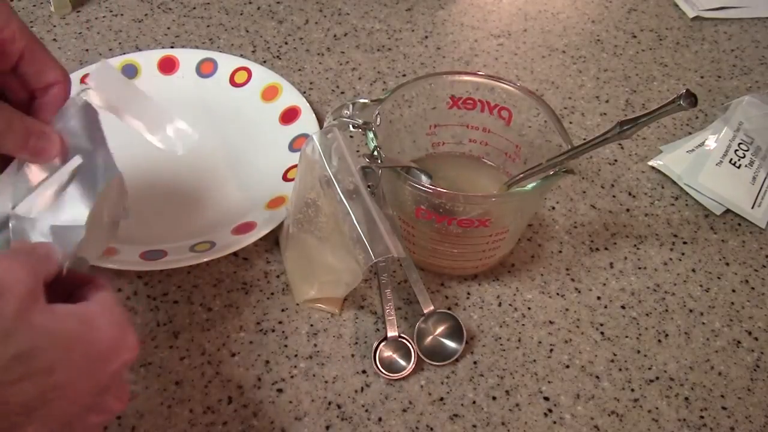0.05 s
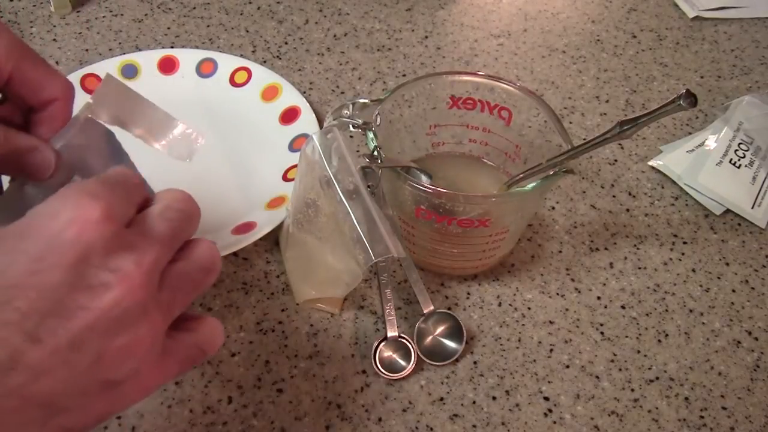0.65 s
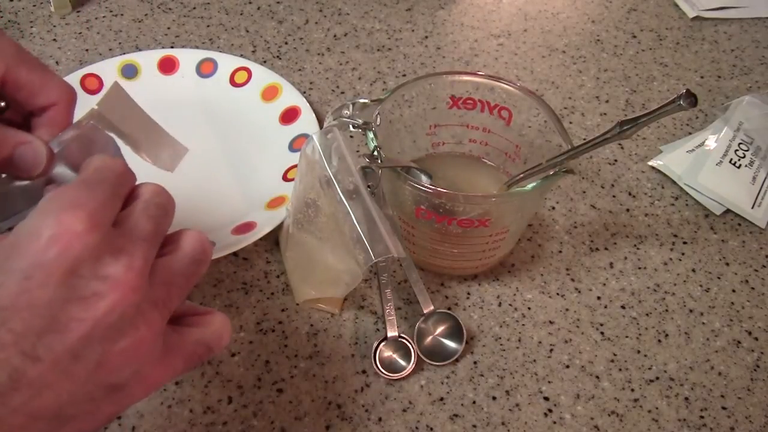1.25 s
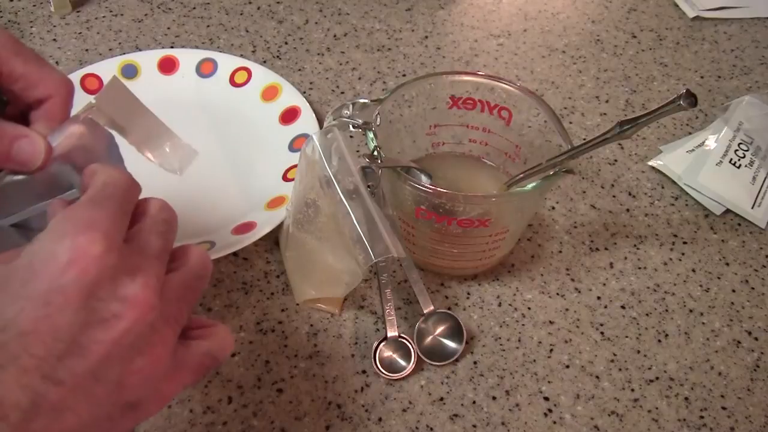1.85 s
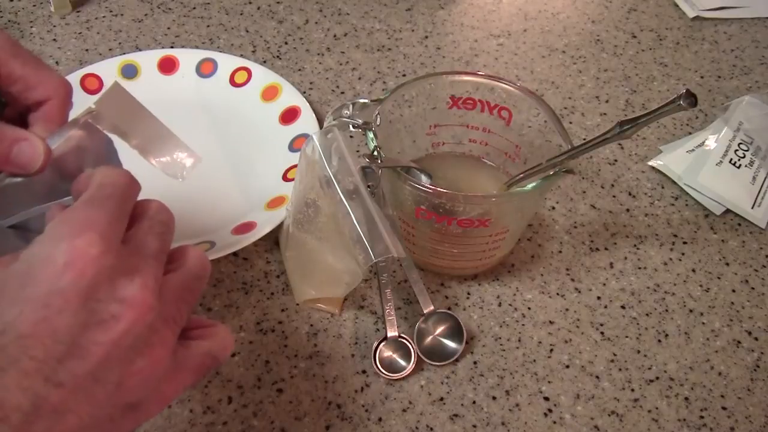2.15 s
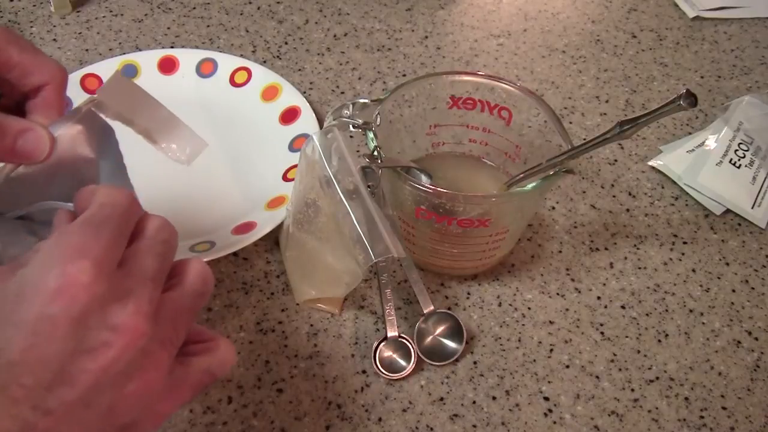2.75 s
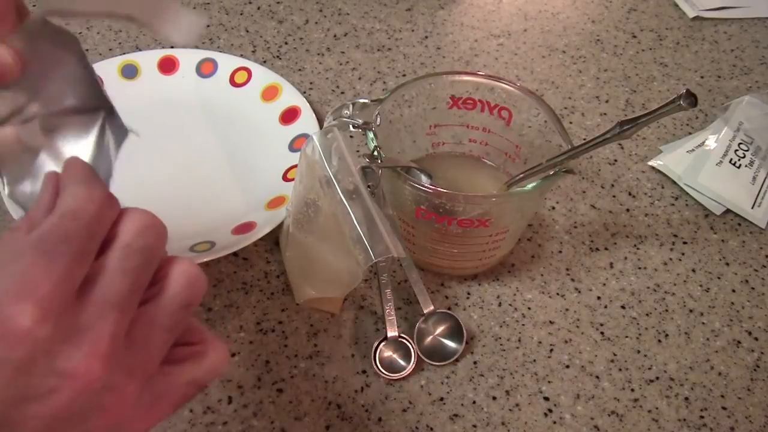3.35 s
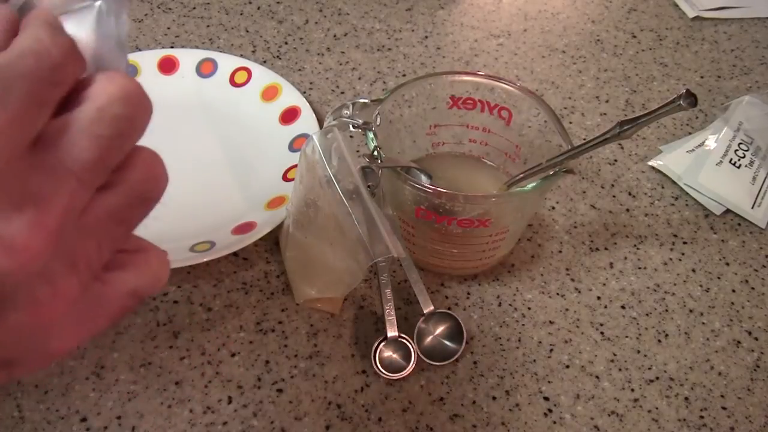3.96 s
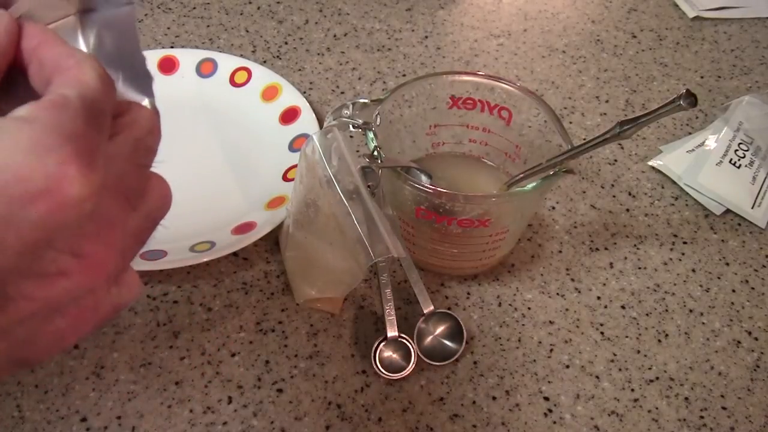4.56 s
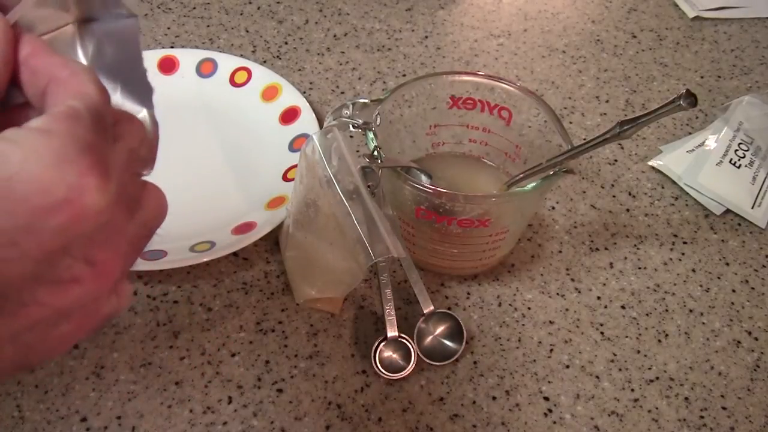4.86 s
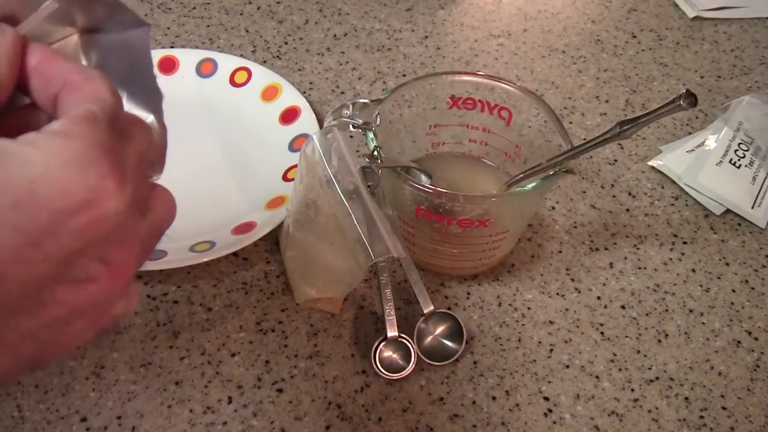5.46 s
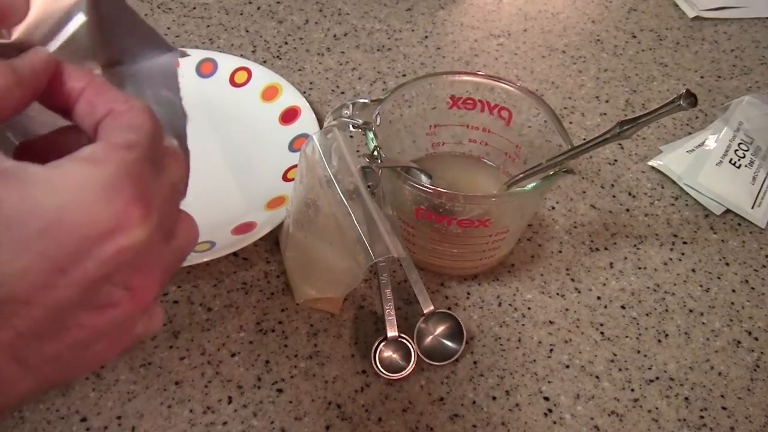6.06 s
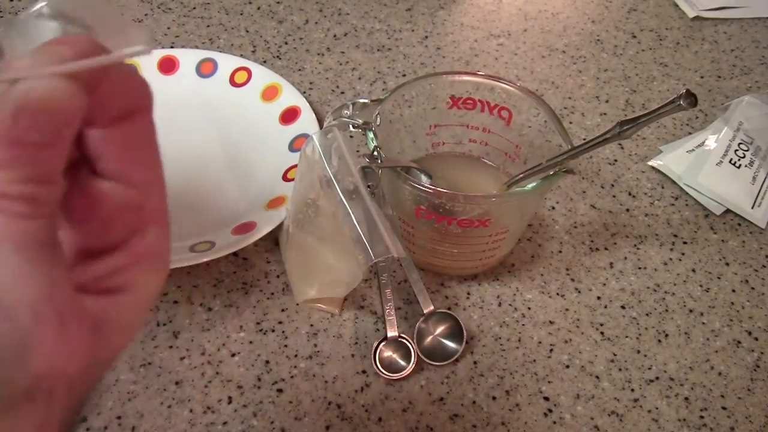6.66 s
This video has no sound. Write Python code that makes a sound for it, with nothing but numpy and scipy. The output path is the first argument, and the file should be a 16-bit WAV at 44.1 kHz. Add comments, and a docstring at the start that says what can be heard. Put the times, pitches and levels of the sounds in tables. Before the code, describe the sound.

In a quiet kitchen with a low, steady motor hum, a foil pouch crinkles in short bursts, close and slightly to the left. After some early crackles and a lull with small rustles, it gives its sharpest snap and crackles open. Fingers then rub and scrape around inside, ending in a last cluster of snaps, each with a brief room echo.

```python
"""Two hands open a small foil pouch over a kitchen counter; an appliance motor hums throughout.
First, rubbing fingers make a fine crackle, creases give way in rasps, panels buckle with snaps.
From 1 to 3 s the handling is sparse. The loudest snap comes at 3.4 s; then the pouch is spread open.
Fingers fish inside, scraping a taut wall, and end in a burst of snaps near 6.2 s.
The kitchen answers each sound briefly."""
import sys
import numpy as np
from scipy import signal
from scipy.fft import rfft, irfft, next_fast_len
from scipy.io import wavfile

SR = 44100
rng = np.random.default_rng(int(sys.argv[2]) if len(sys.argv) > 2 else 0)


def transcribe(u):
    """Save the signal u as a 16-bit wav file named by the first command-line argument.

    u: samples, shape (n,) or (channels, n), limited to [-1, 1]; the rate is SR.
    q: integer samples, one column per channel.
    """
    v = np.clip(np.atleast_2d(u).T, -1, 1)
    q = np.round(v * 32767).astype(np.int16)
    wavfile.write(sys.argv[1], SR, q)


N = 295470
TIME_S = np.arange(N) / SR
OPENS_S, FLEX_S, STROKE_LEAD_S = 3.58, .06, .1
HOLDING_DB = (-74, 4.5, -6)   # faint stir of the held pouch: crack, body re crack, fizz re crack
FACET_EDGES_HZ = np.linspace(np.sqrt(200), np.sqrt(15000), 16) ** 2

# Still air and microphone hiss. Each row: frequency in Hz, density in dB per Hz.
AIR_DENSITY_DB = [(20, -90.5), (45, -88.5), (100, -88.5), (190, -82), (300, -82), (450, -88.5), (750, -91),
                  (1400, -99), (2800, -103), (5000, -110), (8000, -116), (13000, -120), (16000, -130)]
# Stereo width of the air. Each row: frequency in Hz, left-right correlation.
AIR_CORRELATION = [(30, 0.29), (80, 0.55), (180, 0.93), (380, 0.33), (950, 0.17), (2400, 0.32), (6000, .25),
                   (15000, 0.092)]
# Motor and mains. Each row: frequency in Hz, rms level in dB, waver from 0 to 1.
HUM_LINES = [(118.7, -75.5, .15), (166.6, -73.5, 0.7), (207.4, -64, 0.92), (237.9, -63.5, 0.3),
             (268.3, -57.5, 0.24), (359.2, -67, 0.1)]
# Stereo width of the reverb. Each row: frequency in Hz, left-right correlation.
ROOM_CORRELATION = [(200, 0.876), (1600, 0.98), (5000, 0.9), (14000, 0.44)]
# Room tail decay. Each row: frequency in Hz, T60 in seconds.
TAIL_T60_S = [(200, 2.5), (530, 0.45), (1400, 0.46), (3700, 0.42), (9700, 0.5), (15000, 0.4)]
# Room tail strength. Each row: frequency in Hz, gain in dB.
TAIL_GAIN_DB = [(200, -14.5), (600, -9.5), (1400, -11.5), (3000, -13), (7000, -13.5), (14000, -26.5)]
# Microphone port balance. Each row: frequency in Hz, left minus right in dB.
PORT_BALANCE_DB = [(600, 0.3), (1300, 1.5), (3000, 1.6), (5000, -0.23), (9000, 1), (11000, 0.5),
                   (13000, -11), (16000, 2)]
# Microphone port phase. Each row: frequency in Hz, lead of the left port in radians.
PORT_LEAD_RAD = [(1000, 0.2), (4000, 0.21), (8000, 0.61), (11500, .2), (13100, 1.6)]
# Foil registers: hollow, body, crack, fizz. Each row: low edge in Hz, high edge in Hz.
REGISTERS_HZ = [(230, 850), (850, 1800), (1800, 5000), (5000, 13300)]
# Pouch resonances. Each row: frequency in Hz, width in Hz, gain when flat in dB, gain when open in dB.
POUCH_MODES = [(300, 160, -5.5, -1), (474, 130, 3.5, -2), (713, 210, -4.5, -3), (1093, 140, -6.5, -0.5),
               (1377, 210, 2.5, -1.5), (1977, 260, -0.5, -2), (2515, 240, 0, 5), (2930, 680, -1, -9),
               (4330, 710, -10, -11.5), (7598, 1200, -5, -3.5), (9700, 2800, -15, -9)]
# Air sounding in the pouch. Each row: time in seconds, hollow in dB re body.
CAVITY_DB = [(0, -16), (.45, -8), (.62, 0.5), (1.4, -6.5), (3.55, -8.5), (3.85, 3), (4.0, -2), (4.15, -11),
             (5.6, 1), (6.2, 0)]
# Crackle colour. Each row: frequency in Hz, gain in dB.
CRACKLE_COLOUR_DB = [(250, 5.5), (1000, 2.5), (1700, 0), (2300, 0.5), (2800, 0), (3600, 0), (4600, -0.5),
                     (5800, -1), (8000, -5.5), (10500, -3.5), (12500, -8), (15000, -5)]
# Fingertip squeaks. Each row: centre in seconds, half length in seconds, pitch in Hz, level in dB.
FINGER_SQUEAKS = [(0.359, 0.0038, 4130, -55.5), (5.46, 0.0059, 3800, -57), (6.193, 0.0055, 9900, -48)]
# Resonance of a taut wall. Each row: time in seconds, pitch in Hz, relative level in dB.
WALL_RESONANCE = [(2.4, 3010, -75), (2.58, 3030, -68), (3.1, 2915, -61.5), (3.5, 2417, -57.5),
                  (3.7, 2442, -59), (4.1, 2330, -48.5), (4.3, 2694, -85), (4.68, 2490, -66),
                  (4.95, 2600, -69), (5.22, 2670, -62.5), (5.4, 2593, -88), (5.6, 1545, -69),
                  (5.69, 1520, -57), (5.8, 1505, -72), (6.0, 2600, -90), (6.11, 2600, -49.5),
                  (6.22, 2580, -53), (6.36, 2392, -85.5)]
# Creases giving way. Each row: centre in seconds, half length in seconds, relative crack level in dB,
# body and fizz in dB re crack.
CREASE_RASPS = [(0.547, 0.0016, -54, 5, -5), (0.603, 0.0032, -35, -5, 3), (0.6077, 0.0015, -36.5, -6, 2),
                (0.6153, 0.0026, -26, 0, -3.5), (1.234, 0.0019, -49.5, 7, -6), (1.418, 0.0026, -48, 3, -8),
                (3.652, .0025, -36, -3, -10.5), (3.663, 0.0049, -35.5, -3.5, -12),
                (6.212, 0.00326, -36.5, 0, -4)]
# Finger slides. Each row: start in seconds, length in seconds, relative crack level in dB,
# body and fizz in dB re crack.
FINGER_STROKES = [(0, 0.01, -48, 3, -11), (0.033, 0.072, -59.5, 3.5, -12), (0.165, 0.01, -50.5, -4, -4),
                  (0.224, 0.076, -60, 0, -3), (0.349, 0.15, -68, 5, -16), (0.593, 0.035, -46.5, -2.5, -2),
                  (0.67, 0.064, -56, 0, -11), (0.801, 0.13, -62, 2, -15), (1.438, 0.15, -58, 1.5, -10.5),
                  (2.573, 0.035, -68, -1.5, -14.5), (2.79, 0.016, -53.5, -2.5, -12.5),
                  (2.885, 0.13, -64, -3, -13), (3.113, 0.018, -54.5, -8, -8), (3.21, 0.187, -58, -4, -11.5),
                  (3.384, 0.055, -43.5, -2.5, -6.5), (3.469, 0.043, -51, 3.5, -26),
                  (3.676, 0.18, -51.5, 0.5, -7), (3.816, 0.0254, -48, 0, -10),
                  (3.895, 0.044, -62.5, -6, 3.5), (3.954, 0.036, -45.5, -1.5, -12),
                  (3.983, 0.021, -43, 2.5, -10.5), (4.067, 0.052, -48, -3, -15.5),
                  (4.24, 0.085, -66.5, 1, -8), (4.391, 0.21, -63, -5, -16), (4.634, 0.11, -57, -2.5, -14.5),
                  (4.886, 0.019, -58.5, -2.5, -13), (5.037, 0.12, -67, 2, -18),
                  (5.174, 0.097, -58.5, -9, -13.5), (5.443, 0.0097, -61.5, -5, -6),
                  (5.519, 0.079, -60.5, 1, -16), (5.655, 0.1375, -64.5, -4, -11),
                  (6.076, 0.16, -52.5, -5.5, -10.5), (6.187, 0.012, -40, -11.5, -7),
                  (6.234, 0.011, -53, -2, -18.5)]
# Buckling panels. Each row: start in seconds, lower and upper pitch in Hz,
# attack levels of hollow, body, crack and fizz in dB.
PANEL_SNAPS = [(0.1346, 1100, 2050, -58, -51.5, -59, -76), (0.1713, 1300, 2900, -54, -45, -55, -60),
               (0.352, 527, 3900, -49.5, -61, -49.5, -68), (0.4103, 1510, 2270, -57.5, -52, -55, -79.5),
               (0.7309, 780, 1420, -46, -41.5, -56, -68.5), (0.7363, 1000, 3300, -49, -50, -58, -64),
               (0.7776, 515, 1460, -37.5, -27.5, -32, -53), (0.7948, 870, 1470, -49.5, -33.5, -42.5, -55),
               (0.8049, 1210, 2520, -43, -43, -53, -67), (0.8105, 1300, 2300, -49, -54, -53, -67),
               (0.8245, 1300, 2120, -53, -48, -53, -69), (1.6437, 1390, 2880, -63, -54, -59.5, -73.5),
               (2.4486, 1400, 2930, -57, -52, -51.5, -66), (3.1187, 1330, 3000, -59, -48, -53, -53.5),
               (3.1728, 1290, 3100, -44, -37, -35.5, -55), (3.3824, 1137, 2385, -38.5, -16, -17, -25.5),
               (3.4083, 1250, 2130, -56, -30, -30.5, -34), (3.4356, 1300, 3170, -61, -43, -35, -51),
               (3.6826, 1400, 2410, -66, -54, -53, -53), (3.7274, 2226, 8100, -60, -60, -44, -51),
               (3.7361, 2350, 4640, -64, -52, -39, -46), (3.7405, 1400, 2530, -54, -53, -33.5, -41),
               (3.7735, 2400, 10000, -48, -53, -45, -47), (3.788, 1020, 2620, -38.5, -25.5, -24.5, -33.5),
               (3.8175, 1050, 2400, -52, -43, -46, -56), (3.861, 785, 2400, -42, -47.5, -45.5, -55),
               (3.9605, 750, 2500, -48, -57, -45, -60), (4.001, 820, 2350, -53, -42, -41.5, -53),
               (4.0378, 600, 1258, -58, -45, -61, -74), (4.0881, 1152, 2000, -39, -31, -30, -45),
               (4.1564, 2000, 3000, -67, -60, -46.5, -62), (4.2037, 830, 2300, -49, -40, -36.5, -56),
               (4.354, 1266, 1520, -51, -37, -43.5, -66), (4.3869, 2330, 8900, -69, -71, -53.5, -61),
               (4.9063, 1037, 1375, -60, -49.5, -56, -81.5), (5.0069, 2630, 4060, -54, -59, -33.5, -38),
               (5.792, 433, 690, -34, -34.5, -35.5, -59.5), (5.8216, 1110, 2840, -50, -48, -43.5, -67),
               (5.8675, 4000, 11600, -76, -78, -55, -54), (6.0396, 1970, 4000, -44.5, -41, -32.5, -48.5),
               (6.2078, 4300, 10500, -49, -44, -33.5, -43), (6.2098, 402, 2100, -37, -36.5, -32.5, -40),
               (6.2265, 2580, 3220, -63, -59, -40, -51)]


def from_db(db):
    """Decibels to gain."""
    return 10 ** (np.asarray(db) / 20)


def unit_rms(x):
    """Scale to rms 1."""
    return x / np.sqrt(np.mean(x ** 2) + 1e-20)


def in_time(rows):
    """One time curve per value column."""
    times_s, *columns = np.transpose(rows)
    return [np.interp(TIME_S, times_s, column) for column in columns]


def at_hz(points, hz):
    """Interpolate over log frequency."""
    points_hz, values = np.transpose(points)
    return np.interp(np.log(np.maximum(hz, 1)), np.log(points_hz), values)


def coloured(x, colour_db):
    """Apply a gain curve over frequency."""
    size = next_fast_len(N + 4096)
    gain = from_db(at_hz(colour_db, np.fft.rfftfreq(size, 1 / SR)))
    return irfft(rfft(x, size) * gain, size)[:N]


def band(x, edges_hz, order=3):
    """Causal band-pass."""
    return signal.sosfilt(signal.butter(order, edges_hz, "band", fs=SR, output="sos"), x + 1e-18)


def drift(rate_hz):
    """Smooth random curve, rms 1."""
    step, settle = 40, 2000
    pole = np.exp(-2 * np.pi * rate_hz * step / SR)
    white = rng.standard_normal(N // step + settle + 2)
    slow = signal.lfilter([1], [1, -2 * pole, pole * pole], white)[settle:]
    return np.interp(np.arange(N) / step, np.arange(len(slow)), unit_rms(slow))


def rough_tone(phase_rad, width_hz):
    """Narrow noise around a carrier."""
    return drift(width_hz) * np.cos(phase_rad) + drift(width_hz) * np.sin(phase_rad)


def swell(centre_s, half_s):
    """Bell-shaped gain."""
    return np.exp(-np.minimum(((TIME_S - centre_s) / half_s) ** 2 / 2, 50))


def add(out, start_s, sound):
    """Mix a short sound in."""
    start = int(np.clip(start_s * SR, 0, N - 1))
    out[start:start + len(sound)] += sound[:N - start]


def stereo(mid, side, correlation):
    """Two independent noises to a correlated left and right."""
    alike = np.clip(correlation, 0, 1)
    return (np.sqrt(1 + alike) * mid + np.sqrt(1 - alike) * np.array([side, -side])) / np.sqrt(2)


def air():
    """Soft, even room noise, alike at both ports only in the bass."""
    size = next_fast_len(N)
    hz = np.fft.rfftfreq(size, 1 / SR)
    mid, side = rfft(rng.standard_normal((2, size)))
    ports = stereo(mid, side, at_hz(AIR_CORRELATION, hz))
    return irfft(ports * from_db(at_hz(AIR_DENSITY_DB, hz)) * np.sqrt(SR / 2), size)[:, :N]


def hum(waver_hz=3, spread_rad=0.09):
    """Wavering motor and mains lines; standing waves give each port its own phase."""
    mid, side = np.zeros((2, N))
    for hz, db, waver in HUM_LINES:
        phase_rad = 2 * np.pi * (hz * TIME_S + rng.random())
        cos, sin = from_db(db) * np.cos(phase_rad), from_db(db) * np.sin(phase_rad)
        in_phase = np.sqrt(2 - 2 * waver ** 2) + waver * drift(waver_hz)
        quadrature = waver * drift(waver_hz)
        mid += in_phase * cos - quadrature * sin
        side += spread_rad * (in_phase * sin + quadrature * cos)
    return np.array([mid + side, mid - side])


def kitchen(x, near_db=-19, near_t60_s=0.038, gap_s=.004):
    """Close reflections from dishes and counter, then the room tail, in half-octave bands."""
    t = TIME_S[:int(.6 * SR)]
    late_s = np.maximum(t - gap_s, 0)

    def decay(t60_s):
        """Envelope of unit energy."""
        return (t > gap_s) * from_db(-60 * late_s / t60_s) * np.sqrt(np.log(1e6) / (t60_s * SR))

    near = from_db(near_db) * decay(near_t60_s)
    edges_hz = np.geomspace(16, 17000, 21)
    white = rng.standard_normal((2, 2, len(t)))
    response = 0
    for k, (low_hz, high_hz) in enumerate(zip(edges_hz, edges_hz[1:])):
        hz = np.sqrt(low_hz * high_hz)
        mid, side = band(white[k % 2], [low_hz, high_hz], order=2)
        tail = from_db(at_hz(TAIL_GAIN_DB, hz)) * decay(at_hz(TAIL_T60_S, hz))
        response += stereo(mid, side, at_hz(ROOM_CORRELATION, hz)) * (near + tail)
    return signal.fftconvolve(x[None], response, axes=1)[:, :N]


def squeaks(relative_width=0.082):
    """Skin sticks and slips evenly enough for a brief, rough tone."""
    return sum(from_db(db) * swell(s, half_s) * rough_tone(2 * np.pi * hz * TIME_S, relative_width * hz)
               for s, half_s, hz, db in FINGER_SQUEAKS)


def scrape(half_width_hz=250, catch_db=2, catch_hz=30, gain_db=-4):
    """Friction catches and slides, driving a wall resonance that sinks as the pouch slackens."""
    hz, db = in_time(WALL_RESONANCE)
    grip = from_db(db + gain_db + catch_db * drift(catch_hz))
    return grip * rough_tone(2 * np.pi * np.cumsum(hz) / SR, half_width_hz)


def ring(hz, width_hz):
    """25 ms impulse response of a unit-height resonance."""
    t = TIME_S[:int(.025 * SR)]
    return 2 * np.pi * width_hz / SR * np.exp(-np.pi * width_hz * t) * np.cos(2 * np.pi * hz * t)


def pouch_ring(at_s, detune, uneven_db, scatter, scatter_t60_s=0.012, coating_hz=4500):
    """One click: each fold shifts the modes, the coating dulls them, creases and seams scatter them."""
    modes = 0
    for hz, width_hz, flat_db, open_db in POUCH_MODES:
        db = (flat_db if at_s < OPENS_S else open_db) + uneven_db * rng.standard_normal()
        modes += from_db(db) * ring(hz * np.exp(detune * rng.standard_normal()), width_hz)
    modes = signal.sosfilt(signal.butter(1, coating_hz, fs=SR, output="sos"), modes)
    echoes = rng.standard_normal(len(modes)) * from_db(-60 * TIME_S[:len(modes)] / scatter_t60_s)
    echoes /= np.sqrt(np.sum(echoes ** 2))
    return modes + scatter * signal.fftconvolve(modes, echoes)[:len(modes)]


def slips(per_s, spread_db):
    """Tiny slips of uneven size at random moments, rms 1."""
    sizes = from_db(spread_db * np.minimum(rng.exponential(1, N), 4))
    signs = np.sign(rng.random(N) - .5)
    return unit_rms(sizes * signs * (rng.random(N) < per_s / SR))


def facets(per_s, spread_db):
    """Facets between creases flick over, each pinging in its own narrow band; rms 1."""
    bands_hz = zip(FACET_EDGES_HZ, FACET_EDGES_HZ[1:])
    return unit_rms(sum(band(slips(per_s, spread_db), edges_hz, order=2) for edges_hz in bands_hz))


def crackle(clicks):
    """Clicks ring the foil, which changes shape every FLEX_S. One row per register, rms 1."""
    foil = np.zeros(N)
    flex = int(FLEX_S * SR)
    for start in range(0, N, flex):
        fold = pouch_ring(start / SR, detune=0.066, uneven_db=1.0, scatter=0.32)
        add(foil, start / SR, signal.fftconvolve(clicks[start:start + flex], fold))
    foil = coloured(foil, CRACKLE_COLOUR_DB)
    return np.array([unit_rms(band(foil, edges_hz)) for edges_hz in REGISTERS_HZ])


def register_gains(crack_db, body_db, fizz_db, hollow_db):
    """Gains of the four registers, low to high."""
    return from_db([crack_db + body_db + hollow_db, crack_db + body_db, crack_db, crack_db + fizz_db])


def rasps(hollow_db, gain_db=-3.5):
    """Slips crowd into a few milliseconds as a crease rolls over."""
    gains = np.zeros((len(REGISTERS_HZ), N))
    for s, half_s, *levels_db in CREASE_RASPS:
        gains += np.outer(register_gains(*levels_db, hollow_db[int(s * SR)]), swell(s, half_s))
    return from_db(gain_db) * np.sum(gains * crackle(slips(per_s=9800, spread_db=2.5)), axis=0)


def stroke(length_s, rise_db_per_s=499.5, sag_db_per_s=5.5, fall_db_per_s=286):
    """Gain of a stroke, from STROKE_LEAD_S before its start: takes hold, eases, dies away."""
    t = TIME_S[:int((length_s + 3 * STROKE_LEAD_S) * SR)] - STROKE_LEAD_S
    return from_db(rise_db_per_s * np.minimum(t, 0) - sag_db_per_s * np.clip(t, 0, length_s)
                   - fall_db_per_s * np.maximum(t - length_s, 0))


def rubbing(hollow_db, gain_db=-2.02, tick_db=-9):
    """Fingers slide over the foil: fine, dense crackle with lone ticks."""
    power = np.outer(register_gains(*HOLDING_DB, hollow_db.mean()) ** 2, np.ones(N))
    for start_s, length_s, *levels_db in FINGER_STROKES:
        onset_s = start_s - STROKE_LEAD_S
        envelope = stroke(length_s)[int(max(-onset_s, 0) * SR):]
        gains = register_gains(*levels_db, hollow_db[int(start_s * SR)])
        for register, gain in zip(power, gains):
            add(register, onset_s, (gain * envelope) ** 2)
    pings = facets(per_s=1200, spread_db=3.5)
    ticks = from_db(tick_db) * slips(per_s=140, spread_db=1)
    return from_db(gain_db) * np.sum(np.sqrt(power) * crackle(pings + ticks), axis=0)


def panel(at_s, lower_hz, upper_hz, fizz_re_crack_db, lower_db=3, upper_db=2, q=7):
    """A buckling panel swings at two pitches and shakes the pouch; less fizz, softer edge."""
    pouch = pouch_ring(at_s, detune=0.053, uneven_db=3.1, scatter=0.8)
    lower = from_db(lower_db) * ring(lower_hz, lower_hz / q)
    upper = from_db(upper_db) * ring(upper_hz, upper_hz / q)
    corner_hz = np.clip(24000 * 2 ** (fizz_re_crack_db / 10), SR / 7, SR / 3)
    return signal.sosfilt(signal.butter(3, corner_hz, fs=SR, output="sos"), pouch + lower - upper)


def snaps(echo_gain=0.34, echo_s=0.00113, low_cut_hz=400, attack_s=.006):
    """Panels buckle, too small to radiate much bass; the counter returns a dull echo."""
    rings = np.array([panel(s, lower_hz, upper_hz, fizz_db - crack_db)
                      for s, lower_hz, upper_hz, _, _, crack_db, fizz_db in PANEL_SNAPS])
    lags = (SR * echo_s * np.exp(0.18 * rng.standard_normal(len(rings)))).astype(int)
    dull = band(rings, [300, 3000], order=1)
    echoes = np.array([np.roll(echo, lag) for echo, lag in zip(dull, lags)])
    low_cut = signal.butter(3, low_cut_hz, "high", fs=SR, output="sos")
    rings = signal.sosfilt(low_cut, rings + echo_gain * echoes)
    out = np.zeros(N)
    for (s, _, _, *levels_db), sound in zip(PANEL_SNAPS, rings):
        for edges_hz, db in zip(REGISTERS_HZ, levels_db):
            part = band(sound, edges_hz)
            add(out, s, part * from_db(db) / np.std(part[:int(attack_s * SR)]))
    return out


def microphone(x):
    """Each port takes half of the level and phase difference."""
    size = next_fast_len(N + 4096)
    hz = np.fft.rfftfreq(size, 1 / SR)
    half = np.array([[.5], [-.5]])
    ports = from_db(half * at_hz(PORT_BALANCE_DB, hz)) * np.exp(1j * half * at_hz(PORT_LEAD_RAD, hz))
    return irfft(rfft(x, size) * ports, size)[:, :N]


def scene():
    """The pouch, close and slightly left, in the humming kitchen."""
    hollow_db, = in_time(CAVITY_DB)
    foil = snaps() + rubbing(hollow_db) + rasps(hollow_db) + scrape() + squeaks()
    return microphone(foil + kitchen(foil)) + hum() + air()


def record(dry, cutoff_hz=15700):
    """Steep low-pass."""
    return signal.sosfilt(signal.ellip(10, .1, 80, cutoff_hz, fs=SR, output="sos"), dry)


dry = scene()
out = record(dry)
transcribe(out)
```